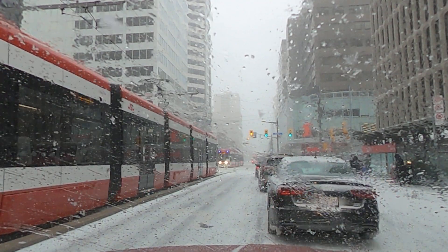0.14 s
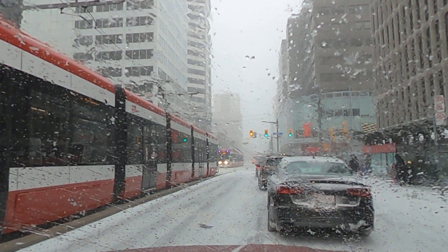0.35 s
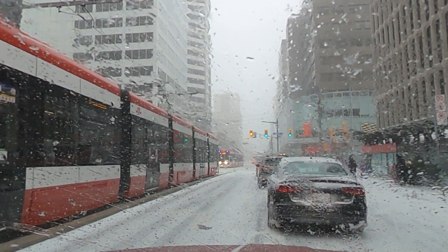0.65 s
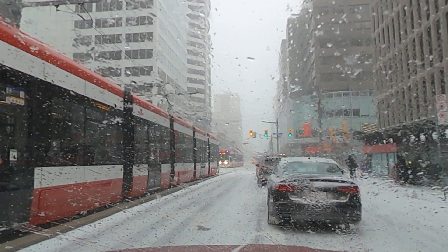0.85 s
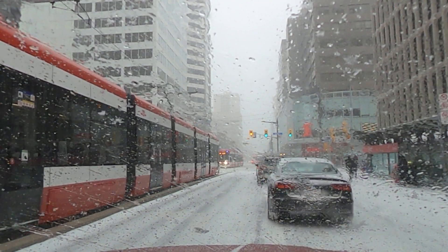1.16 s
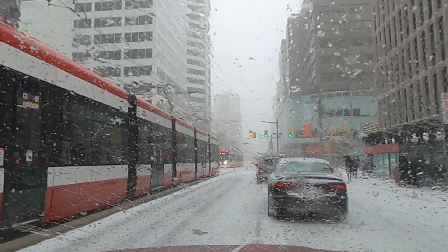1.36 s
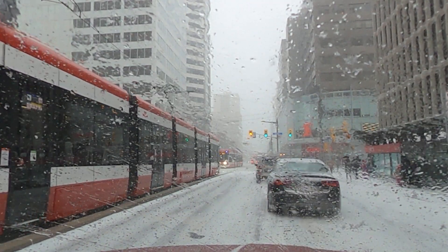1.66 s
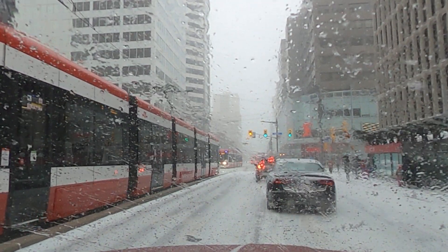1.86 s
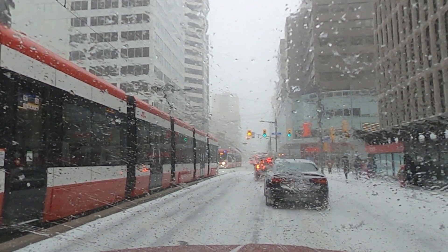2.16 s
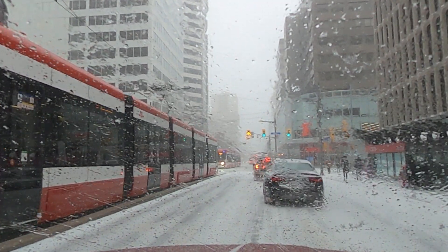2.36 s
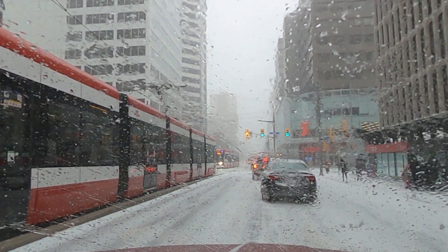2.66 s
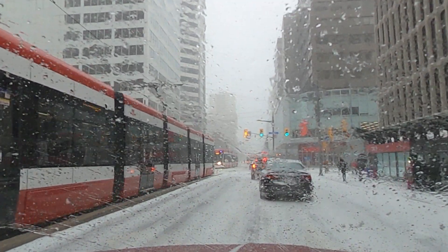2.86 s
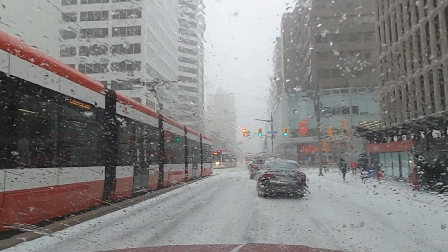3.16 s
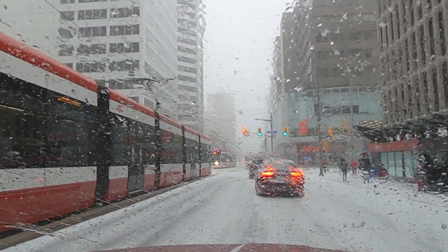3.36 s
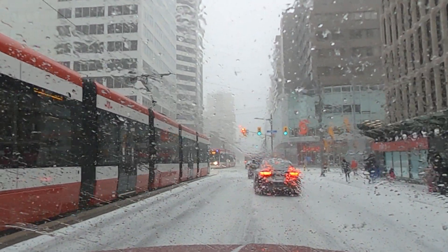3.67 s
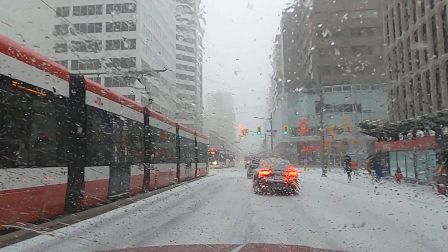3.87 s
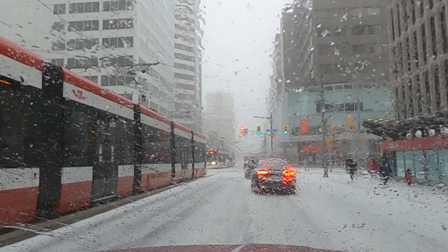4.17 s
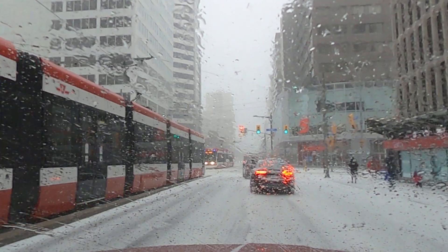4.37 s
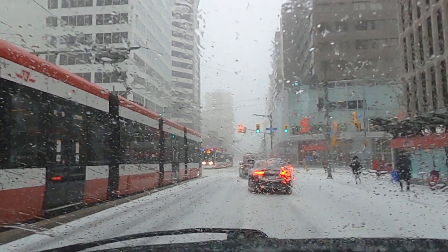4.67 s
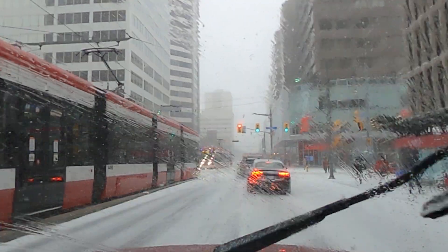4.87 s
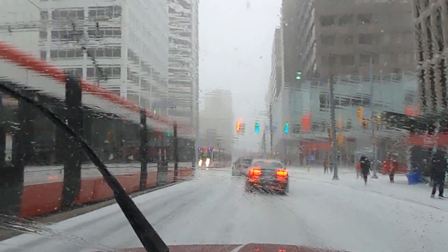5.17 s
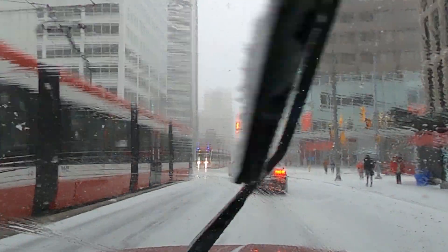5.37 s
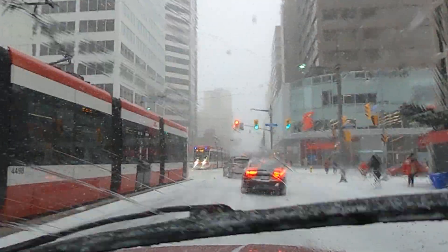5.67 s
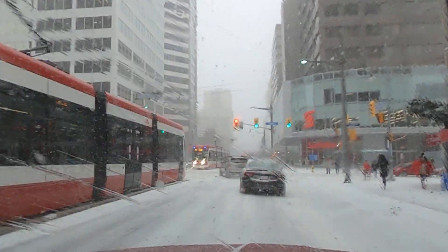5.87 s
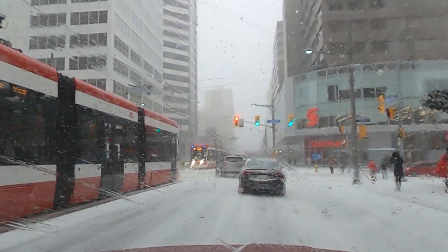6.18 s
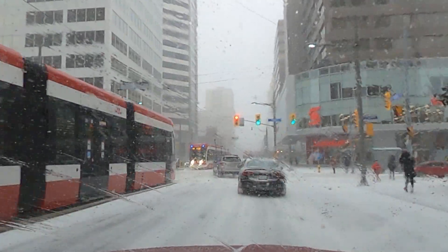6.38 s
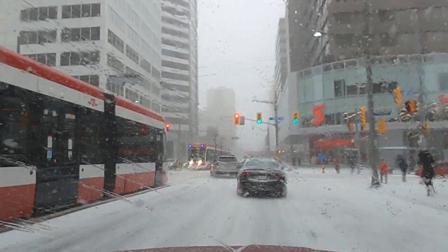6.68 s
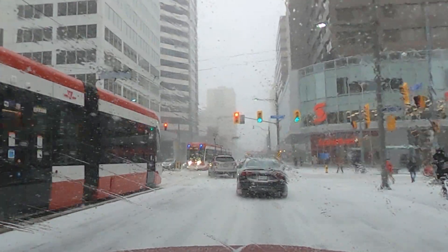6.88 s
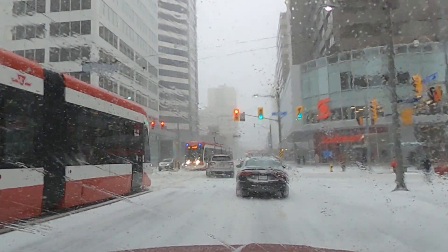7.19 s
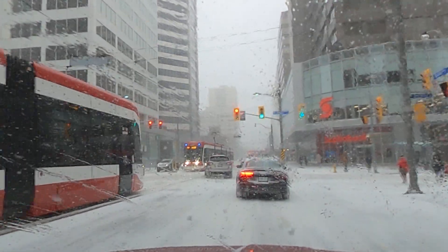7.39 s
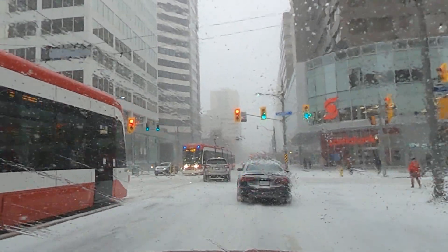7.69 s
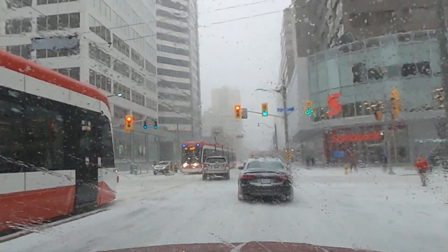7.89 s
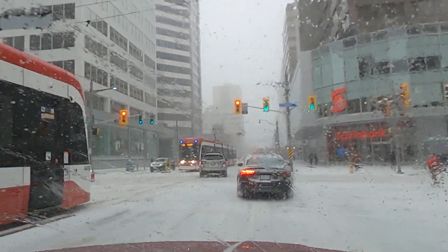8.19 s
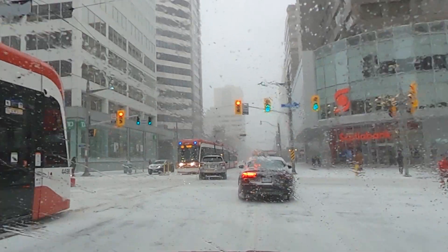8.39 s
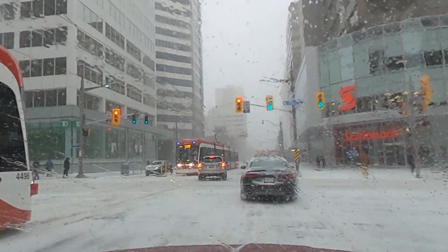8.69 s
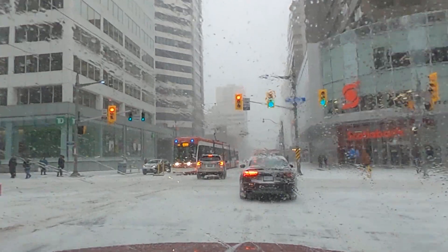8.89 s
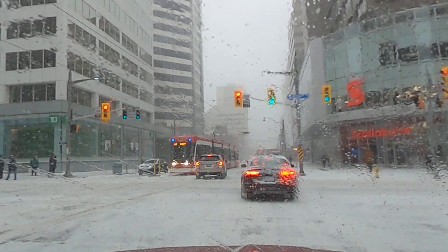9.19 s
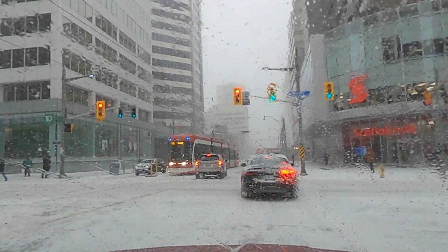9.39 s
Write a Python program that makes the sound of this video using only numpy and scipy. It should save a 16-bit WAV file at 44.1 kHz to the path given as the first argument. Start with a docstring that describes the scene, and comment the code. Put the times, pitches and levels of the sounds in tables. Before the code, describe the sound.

Muffled car cabin with deep engine drone and tyre rumble over packed snow, wipers thudding and squeaking once midway, suspension knocks, faint fan hiss.

```python
"""The engine booms inside a car that pulls away along a snowy street: sines follow the firing rate.
The tyres rumble, crunch and ring over packed snow and ruts, from shaped noise, grains and a wavering tone.
The wipers sweep once up and down, with grainy rubber, juddering blade, thudding arm and knocking linkage.
Now and then something squeaks, the trim scuffs or metal clinks, from chirps, grains and ringing sines.
Behind it all the demister fan blows, as shaped noise."""
import sys
import numpy as np
from scipy import signal
from scipy.fft import rfft, irfft, next_fast_len
from scipy.io import wavfile

SR = 44100
rng = np.random.default_rng(int(sys.argv[2]) if len(sys.argv) > 2 else 0)


def to_wav(s):
    """Save 16-bit WAV."""
    ch = np.atleast_2d(s).T  # columns
    pcm = np.round(np.clip(ch, -1, 1) * 32767)  # PCM
    wavfile.write(sys.argv[1], SR, pcm.astype(np.int16))


N = 420713
T = np.arange(N) / SR


def undb(db):
    """Decibels to gain."""
    return 10 ** (np.asarray(db) / 20)


def unit(x):
    """Scale to rms 1."""
    return x / np.sqrt(np.mean(x ** 2))


def curves(rows):
    """Each column of a table joined by straight lines in time."""
    s, *columns = np.transpose(rows)
    return [np.interp(T, s, column) for column in columns]


def noise():
    """White noise."""
    return rng.standard_normal(N)


def walk(rate):
    """Smooth chance with spread 1, changing about rate times a second."""
    size = next_fast_len(N, True)
    f = np.arange(size // 2 + 1) * SR / size
    smoothed = rfft(noise(), size) * np.exp(-(f / rate) ** 2)
    return unit(irfft(smoothed, size)[:N])


def tone(hz):
    """A sine of rms 1 that follows hz from a random phase."""
    cycles = np.cumsum(hz) / SR + rng.random()
    return np.sqrt(2) * np.sin(2 * np.pi * cycles)


def grains(rate, spread_db):
    """Tiny slips of uneven size at random moments, about rate a second."""
    hits = rng.random(N) < rate / SR
    signs = rng.choice([-1, 1], N)
    sizes = undb(spread_db * np.minimum(rng.exponential(size=N), 4))
    return hits * signs * sizes


def colour(x, points):
    """Give x a spectrum through (frequency [Hz], relative level [dB]) points; rms 1."""
    hz, db = np.transpose(points)
    f = np.maximum(np.arange(N // 2 + 1) * SR / N, 1)
    skirts = np.minimum(f / hz[0], 1) ** 2 * np.minimum(hz[-1] / f, 1) ** 2
    shape = undb(np.interp(np.log(f), np.log(hz), db))
    return unit(irfft(rfft(x) * skirts * shape, N))


def ring(x, modes):
    """Steep resonances driven by x: each peak filter is passed twice."""
    out = 0
    for hz, width, db in modes:
        b, a = signal.iirpeak(hz, hz / width, fs=SR)
        once = signal.lfilter(b, a, x)
        out = out + undb(db) * signal.lfilter(b, a, once)
    return out


def swell(s, half):
    """A level that builds and lets go around time s, 4.3 dB down at a distance of half."""
    away = np.abs(T - s) / half
    near = away < 10
    out = np.zeros(N)
    out[near] = np.exp(-.5 * away[near] ** 1.54)
    return out


def stroke(s, rise, fall):
    """A rub that builds up to time s and lets go at its own pace."""
    return swell(s, np.where(T < s, rise, fall))


def decay(s, length, rise):
    """A blow at time s that dies away."""
    age = np.maximum(T - s, 0)
    return (1 - np.exp(-age / rise)) * np.exp(-np.minimum(age / length, 20))


# how fast the load builds and lets go [s]
LOAD_ATTACK_S, LOAD_RELEASE_S = 0.04, 0.18


def push(start, end):
    """Load on the engine: it builds from start, holds, and lets go after end."""
    build = 1 - np.exp(-np.maximum(T - start, 0) / LOAD_ATTACK_S)
    return build * np.exp(-np.maximum(T - end, 0) / LOAD_RELEASE_S)


# pushes on the throttle that load the engine and make it boom:
# (start [s], end [s], level at the start [dB], growth [dB/s])
THROTTLE_PUSHES = [(0.788, 2.1, -22.5, 2.5), (2.252, 2.75, -23, 11), (2.947, 3.246, -29.5, 2),
                   (3.598, 4.203, -31, -1.5), (4.295, 4.85, -25, -2), (6.604, 7.798, -17.5, -7.5),
                   (8.152, 8.602, -23, 3.5)]
COAST_DB = -34.5  # boom left off throttle


def engine_boom(firing):
    """The firing pulses pump the cabin air, harder under load."""
    load = 0
    for start, end, db, growth in THROTTLE_PUSHES:
        held = np.clip(T, start, end) - start
        load = load + push(start, end) * undb(db + growth * held)
    return firing * np.hypot(load, undb(COAST_DB)) * undb(0.55 * walk(5.9))


# engine overtones: (multiple of the firing rate, level relative to the drone [dB])
OVERTONES = [(2, 0.5), (3, -11.5), (4, -17), (5, -20), (6, -20), (8, -25)]
# the drone swells briefly as the load shifts: (time [s], lift [dB])
DRONE_SURGES = [(2.42, 6.1), (4.18, 9.1), (5.71, 12), (6.7, 7.54)]
SURGE_HALF_S = 0.1
DRONE_DB, DRONE_DB_PER_OCTAVE = -38, 7  # at the reference firing rate, and its change with revs
# the overtones sink once the driver lifts off
LIFT_OFF_S, LIFT_OFF_FALL_S, OVERRUN_DB = 4.6, 0.34, -2.5


def engine_drone(hz, octaves):
    """Overtones of the firing rate, each wavering with uneven combustion."""
    surges = sum(db * swell(s, SURGE_HALF_S) for s, db in DRONE_SURGES)
    overrun = OVERRUN_DB * (1 - np.exp(-np.maximum(T - LIFT_OFF_S, 0) / LIFT_OFF_FALL_S))
    drone_db = DRONE_DB + DRONE_DB_PER_OCTAVE * octaves + surges + overrun
    return sum(tone(k * hz) * undb(drone_db + db + 2.4 * walk(14)) for k, db in OVERTONES)


BUZZ_DB, BUZZ_DB_PER_OCTAVE = -52, -11  # at the reference firing rate, and its change with revs


def dashboard_buzz(firing, octaves):
    """A dashboard resonance that is shaken harder once in each firing."""
    shaking = noise() * undb(2 * firing)
    return unit(ring(shaking, [(178.8, 59, 0)])) * undb(BUZZ_DB + BUZZ_DB_PER_OCTAVE * octaves)


# road speed, shared with the tyre rumble: (time [s], speed [km/h])
ROAD_SPEED = [(0, 15), (1.8, 14.5), (3.6, 26), (4.25, 28), (4.9, 29.3), (5.8, 28.3), (7.3, 26), (9.54, 26)]
# body resonance that the gear whine passes through: (frequency [Hz], width per pass [Hz], level [dB])
WHINE_RESONANCE = [(352.3, 18, -42.5)]
WHINE_HZ_PER_KMH = 12


def gear_whine():
    """The gears whine in pitch with road speed, heard as they pass through a body resonance."""
    kmh, = curves(ROAD_SPEED)
    return ring(tone(WHINE_HZ_PER_KMH * kmh), WHINE_RESONANCE) * undb(0.96 * walk(4))


# engine pulling away, easing off, then in a higher gear: (time [s], firing rate [Hz])
FIRING_RATE = [(0, 24.2), (.5, 25.23), (.8, 29.04), (1.53, 31.43), (1.95, 38.54), (2.45, 42.49),
               (2.87, 48.47), (3.38, 59.4), (4.2, 63.23), (4.55, 69.32), (4.85, 66.62), (5.25, 63.4),
               (5.9, 61.45), (6.5, 37.81), (7.2, 36.7), (8.48, 32.78), (9.54, 29.94)]
REF_FIRING_HZ = 60


def engine():
    """One firing rate drives boom, drone and dashboard buzz; the gears whine faintly on top."""
    hz, = curves(FIRING_RATE)
    octaves = np.log2(hz / REF_FIRING_HZ)
    firing = tone(hz)
    boom_and_drone = engine_boom(firing) + engine_drone(hz, octaves)
    return boom_and_drone + dashboard_buzz(firing, octaves) + gear_whine()


# spectrum of the body rumble: (frequency [Hz], relative level [dB])
RUMBLE_SPECTRUM = [(14, -16), (24, -8), (36, 1), (50, 0), (68, -0.5), (90, -4), (125, -5.5), (165, -9.5),
                   (205, -16.5), (240, -17.5), (330, -25.5), (600, -57)]
# tyre rumble at cruising speed, and its growth with speed
CRUISE_KMH, RUMBLE_DB, RUMBLE_DB_PER_KMH = 26.85, -24.5, .5


def body_rumble():
    """The road shakes the body into a low rumble that grows with speed."""
    kmh, = curves(ROAD_SPEED)
    return colour(noise(), RUMBLE_SPECTRUM) * undb(RUMBLE_DB + RUMBLE_DB_PER_KMH * (kmh - CRUISE_KMH))


# spectrum of packing snow: (frequency [Hz], relative level [dB])
CRUNCH_SPECTRUM = [(120, -5.5), (220, 3.5), (340, 1.5), (450, -2.5), (560, -5), (750, -13.5), (1000, -25),
                   (1400, -30), (3000, -42), (8000, -67.5)]
# state of the snow under the wheels: (time [s], crunch level [dB], body wallow level [dB])
SNOW_SURFACE = [(0, -37, -41.5), (2.9, -41, -42), (3.4, -40, -25.5), (4.9, -36.5, -33.5),
                (5.9, -38.5, -23.5), (6.4, -39, -33.5), (7.3, -42, -27), (8.4, -40.5, -24),
                (8.95, -40.5, -38), (9.3, -39.5, -21.5)]


def snow_crunch():
    """Snow packs under the tread in dense grains while the body wallows at a deep resonance."""
    crunch_db, wallow_db = curves(SNOW_SURFACE)
    wallow = unit(ring(noise(), [(35.8, 22, 0)])) * undb(wallow_db)
    crunch = colour(grains(5000, 1.5), CRUNCH_SPECTRUM) * undb(crunch_db + walk(3.7))
    return wallow + crunch


# air ring inside the rolling tyres: (time [s], level [dB])
TYRE_RING_LEVEL = [(0, -68.5), (3.2, -52), (4.5, -40.5), (5.4, -35.5), (5.7, -33), (6.1, -33), (6.8, -38.5),
                   (7.4, -30), (8.4, -36), (9.54, -34)]
TYRE_RING_HZ = 145.7


def tyre_ring():
    """The air inside the tyres rings at a wandering pitch and level."""
    db, = curves(TYRE_RING_LEVEL)
    return tone(TYRE_RING_HZ + 4 * walk(6.84)) * undb(db + 3 * walk(7.7))


# swells of soft hiss, likely slush off the wheels: (time of the top [s], build-up [s], level [dB])
SPRAY_SWELLS = [(.15, 0.21, -80), (.58, 0.096, -69), (1.68, 0.29, -67), (4.3, 0.51, -76.5),
                (6.6, 0.32, -70), (8.4, 0.29, -72), (9.4, 0.44, -72.5)]
# each swell falls in this share of its build-up time, down to a faint steady hiss
SPRAY_FALL_SHARE, SPRAY_FLOOR_DB = .5, -85


def spray():
    """Spray hisses in soft swells over a faint floor."""
    spectrum = [(2000, -3.5), (3500, -2), (5500, -2), (7600, -7), (9200, -15), (13000, -25.5)]
    hiss = colour(noise(), spectrum)
    slush = sum(stroke(s, build, build * SPRAY_FALL_SHARE) * undb(db) for s, build, db in SPRAY_SWELLS)
    return hiss * np.hypot(slush, undb(SPRAY_FLOOR_DB)) * undb(1.1 * walk(14))


def tyres():
    """Everything that the rolling wheels stir up between the ruts."""
    return body_rumble() + snow_crunch() + tyre_ring() + spray()


# ruts under the wheels: (time [s], peak level before the cabin [dB])
RUT_HITS = [(0.038, -29.5), (1.251, -36), (2.43, -32), (3.447, -25.5), (6.806, -29), (7.039, -26),
            (7.203, -24), (7.575, -23.5), (7.73, -27.5), (7.877, -22.5), (9.124, -26), (9.33, -33)]
# suspension resonances: (frequency [Hz], width per pass [Hz], relative level [dB])
SUSPENSION_MODES = [(167, 51, 4.5), (304.6, 70, 4.5), (486, 125, -5), (770, 160, -25.5)]


def ruts():
    """Each ridge of snow knocks the suspension with a short, dull rattle."""
    out = 0
    for s, db in RUT_HITS:
        knock = ring(noise() * decay(s, 0.014, 0.0022), SUSPENSION_MODES)
        out = out + undb(db) * knock / np.abs(knock).max()
    return out


# wiper contacts on the way up, at the turn, on the way down and parking: (time of the top [s],
# build-up [s], let-go [s], arm thud level [dB], blade judder level [dB], rubber swish level [dB])
WIPER_CONTACTS = [(4.682, 0.023, 0.028, -28, -33, -45), (4.692, 0.0027, 0.0096, -16, -46, -52),
                  (4.713, .006, 0.0042, -34, -48, -48.5), (4.947, 0.017, 0.019, -48, -56, -47),
                  (4.996, 0.0017, 0.017, -49, -35, -58), (5.019, .012, 0.013, -50, -41, -48),
                  (5.046, 0.0051, 0.044, -36, -40.5, -49), (5.181, 0.014, 0.015, -45, -39, -43),
                  (5.243, 0.0079, .008, -53, -46, -55), (5.402, 0.032, 0.07, -37, -49.5, -51.5),
                  (5.491, .002, 0.0068, -43, -33.5, -52), (5.505, 0.0035, 0.0077, -38.5, -32, -49),
                  (5.53, 0.0063, 0.0054, -39, -32, -46), (5.546, 0.0053, .012, -29, -31.5, -50.5),
                  (5.685, 0.024, 0.025, -42, -56, -55), (5.847, 0.012, 0.012, -34, -45, -48.5),
                  (5.866, 0.0054, 0.014, -26.5, -42.5, -46), (5.893, 0.0063, 0.016, -35, -54, -51),
                  (5.93, 0.0033, 0.014, -30, -53, -48.5)]
# arm tones: (frequency [Hz], pitch wander [Hz], level relative to the thud [dB])
ARM_TONES = [(228, 20, -3), (276.3, 20, -8.5)]
# blade resonances: (frequency [Hz], width per pass [Hz], relative level [dB])
BLADE_MODES = [(443.7, 140, 12.5), (615, 193, 11.5), (768, 140, 2.5), (1083, 120, -6.5), (1327, 59, -6.5),
               (1850, 290, -12.5)]
# spectrum of rubber on wet glass: (frequency [Hz], relative level [dB])
SWISH_SPECTRUM = [(600, 3.5), (1300, -3.5), (1650, -6), (2200, -4), (3000, -5), (4000, -12), (5500, -18),
                  (7800, -26), (9200, -36), (14000, -48)]
# the level of the swish stutters as the rubber skips over the glass
STUTTER_DB, STUTTER_PER_S = 1.8, 130


def wipers():
    """Rubber sticks and slips on wet glass; the blade judders and the arm thuds as it takes up the snow."""
    arm = sum(tone(hz + wander * walk(30)) * undb(db + 0.94 * walk(40)) for hz, wander, db in ARM_TONES)
    blade = unit(ring(grains(2300, 3.7), BLADE_MODES))
    rubber = colour(grains(4500, 2.6), SWISH_SPECTRUM) * undb(STUTTER_DB * walk(STUTTER_PER_S))
    out = 0
    for s, rise, fall, thud_db, judder_db, swish_db in WIPER_CONTACTS:
        contact = undb(thud_db) * arm + undb(judder_db) * blade + undb(swish_db) * rubber
        out = out + stroke(s, rise, fall) * contact
    return out


# the wiper linkage knocks as it takes up its slack and reverses: (time [s], peak level [dB])
LINKAGE_KNOCKS = [(4.994, -27), (5.011, -32), (5.038, -28), (5.499, -24), (5.527, -22.5), (5.538, -26),
                  (5.545, -26)]
# what those knocks ring with: (frequency [Hz], relative level [dB], 60 dB decay time [s])
LINKAGE_MODES = [(430, -2, 0.1), (572, -1, 0.039), (665, -3, 0.03), (787, -3, 0.022), (905, -9.5, .035),
                 (1100, -20, .06), (1340, -14.5, 0.044), (1900, -18, 0.035)]


def knocks():
    """Hard contacts in the wiper linkage ring the scuttle under the windscreen, each a little differently."""
    out = np.zeros(N)
    age = np.arange(SR // 4) / SR
    for s, db in LINKAGE_KNOCKS:
        knock = 0
        for hz, mode_db, t60 in LINKAGE_MODES:
            gain = undb(mode_db + 1.8 * rng.standard_normal())
            pitch = hz * (1 + 0.013 * rng.standard_normal())
            wave = np.sin(2 * np.pi * (pitch * age + rng.random()))
            knock = knock + gain * wave * np.exp(-np.log(1000) * age / t60)
        knock = knock * (1 - np.exp(-age / 0.0012))
        start = int(s * SR)
        out[start:start + len(age)] += undb(db) * knock / np.abs(knock).max()
    return out


# rubber and trim squeaks: (time of the top [s], build-up [s], let-go [s], pitch [Hz], glide [Hz/s],
# hoarse pitch spread [Hz], level [dB], octave level relative to the first partial [dB])
SQUEAK_CHIRPS = [(.224, 0.0047, 0.008, 1910, -1500, 90, -58, -2.5),
                 (4.681, 0.014, 0.011, 2250, -5000, 330.6, -41, -21),
                 (5.493, 0.0045, 0.0044, 2155, 26001, 170, -43, -21),
                 (5.526, .004, .005, 3250, -9000, 160, -50.5, -22),
                 (5.874, .007, .01, 2300, 1, 280, -50, -21), (6.644, .007, .0105, 2330, 0, 150, -43, -13)]
# how fast a squeak's pitch and grip waver, and how deeply the grip flutters
WAVER_PER_S, FLUTTER_DB = 600, 4


def squeaks():
    """Brief hoarse stick-slip chirps; each partial wavers and flutters on its own."""
    out = 0
    wavers = [walk(WAVER_PER_S) for _ in range(2)]
    grips = [unit(undb(FLUTTER_DB * np.clip(walk(WAVER_PER_S), -2, 2))) for _ in range(2)]
    for s, rise, fall, hz, glide, spread, db, octave_db in SQUEAK_CHIRPS:
        pitch = hz + glide * np.clip(T - s, -rise, fall)
        first = tone(pitch + spread * wavers[0]) * grips[0]
        octave = tone(2 * (pitch + spread * wavers[1])) * grips[1]
        out = out + (first + undb(octave_db) * octave) * stroke(s, rise, fall) * undb(db)
    return out


# brief dry scuffs in the cabin:
# (time of the top [s], build-up [s], let-go [s], rasp level [dB], hollow panel level [dB])
TRIM_SCUFFS = [(0.097, .011, 0.014, -56, -59), (.168, .009, .009, -64, -70), (.228, .008, .013, -65, -52.5),
               (0.585, 0.0092, .01, -59, -58), (1.053, 0.01, 0.0085, -64, -70),
               (3.029, .004, .004, -66, -68), (3.761, .0044, .0044, -63, -70),
               (6.663, 0.017, 0.0095, -59, -60), (6.709, 0.038, 0.032, -59.5, -70),
               (6.805, 0.029, 0.029, -59.5, -63), (6.9, 0.022, 0.036, -66, -72)]
# spectrum of the rasp: (frequency [Hz], relative level [dB])
RASP_SPECTRUM = [(1200, -6), (2500, 1), (4500, 2), (7500, -7.5), (9500, -18.5), (14000, -24.5)]
# plastic panel that the scuffs excite: (frequency [Hz], width per pass [Hz], relative level [dB])
PANEL_MODES = [(1350, 600, -0.5), (2050, 500, -1)]


def trim():
    """Small dry, grainy scuffs in the cabin; some sound a hollow panel."""
    rasp = colour(grains(9000, 1.8), RASP_SPECTRUM) * undb(1.2 * walk(60))
    panel = unit(ring(grains(4000, 2.5), PANEL_MODES))
    out = 0
    for s, rise, fall, rasp_db, panel_db in TRIM_SCUFFS:
        out = out + stroke(s, rise, fall) * (undb(rasp_db) * rasp + undb(panel_db) * panel)
    return out


# tiny metal clinks: (time [s], level [dB], brightness [dB/octave])
CLINK_TICKS = [(8.064, -77, -2), (8.249, -74, 3), (8.532, -77, -4), (8.581, -67, -10), (8.755, -71, 7),
               (8.789, -73.5, 5), (8.89, -79, 2), (9.319, -58.5, -7), (9.419, -65.5, 1)]
# modes of the small metal: (frequency [Hz], level relative to the clink [dB], 60 dB decay time [s])
CLINK_MODES = [(6040, -7.5, .026), (7192, 0, .052), (8419, -11.5, .03), (10210, -14, .08),
               (12330, 0.5, .06), (12510, -5, .04), (13100, -4, .015)]


def clinks():
    """Something small and metallic, perhaps hanging keys, touches and rings briefly."""
    out = np.zeros(N)
    age = np.arange(SR // 4) / SR
    pivot_hz = CLINK_MODES[1][0]  # brightness tilts around the second mode
    for s, db, tilt in CLINK_TICKS:
        start = int(s * SR)
        for hz, mode_db, t60 in CLINK_MODES:
            gain = undb(db + mode_db + tilt * np.log2(hz / pivot_hz) + 1.5 * rng.standard_normal())
            envelope = np.exp(-np.log(1000) * age / t60) * (1 - np.exp(-age / .0005))
            mode = gain * np.sqrt(2) * np.sin(2 * np.pi * hz * age) * envelope
            out[start:start + len(age)] += mode[:N - start]
    return out


# spectrum of the demister: (frequency [Hz], relative level [dB])
FAN_SPECTRUM = [(530, -29), (900, -1.5), (1040, -2), (1080, -11), (1210, -7), (1390, -3), (1940, -10),
                (2100, -8), (2290, -12.5), (3300, -14), (3970, -21), (5740, -27), (8040, -36.5),
                (9250, -56.5), (12000, -58), (15600, -84.5), (22000, -120)]
# rushing air before the cabin: (time [s], level [dB])
FAN_AIR_LEVEL = [(0, -53.5), (1.7, -54.5), (2.9, -58), (3.6, -55), (5.1, -54), (6.1, -56.5), (6.7, -55.5),
                 (7.1, -59), (8, -57), (9.54, -56.5)]


def fan():
    """Air hisses through the windscreen vents."""
    db, = curves(FAN_AIR_LEVEL)
    return colour(noise(), FAN_SPECTRUM) * undb(db + 0.75 * walk(28))


# cabin and duct resonances that colour all the rushing: (frequency [Hz], width [Hz], lift or dip [dB])
CABIN_MODES = [(250, 13, 1.5), (443, 50, -0.5), (525, 23, 3), (587, 26, -3.5), (712, 14, 1.5), (802, 31, 5),
               (920, 42, -1), (960, 14, 2), (1300, 82, 1.5), (1626, 85, -5), (1677, 45, 5), (2090, 57, 2.5),
               (2580, 65, 0.5)]


def cabin(x):
    """Standing waves lift some narrow bands and hollow out others."""
    f = np.arange(N // 2 + 1) * SR / N
    bands_db = sum(db / (1 + (2 * (f - hz) / width) ** 2) for hz, width, db in CABIN_MODES)
    return irfft(rfft(x) * undb(bands_db), N)


def scene():
    """Everything as it reaches the dashboard; the cabin colours the tyres, ruts and fan."""
    coloured = cabin(tyres() + ruts() + fan())
    wiper_sounds = wipers() + knocks()
    details = squeaks() + trim() + clinks()
    return (engine() + coloured + wiper_sounds + details)[None]


TOP_HZ = 14500


def record(dry):
    """Ease the sound in and out, then cut the top with a steep low-pass."""
    ease = np.clip(np.minimum(T, T[-1] - T) / .004, 0, 1)
    low_pass = signal.ellip(8, .2, 70, TOP_HZ, fs=SR, output="sos")
    return signal.sosfilt(low_pass, dry * ease)


dry = scene()
out = record(dry)
to_wav(out)
```